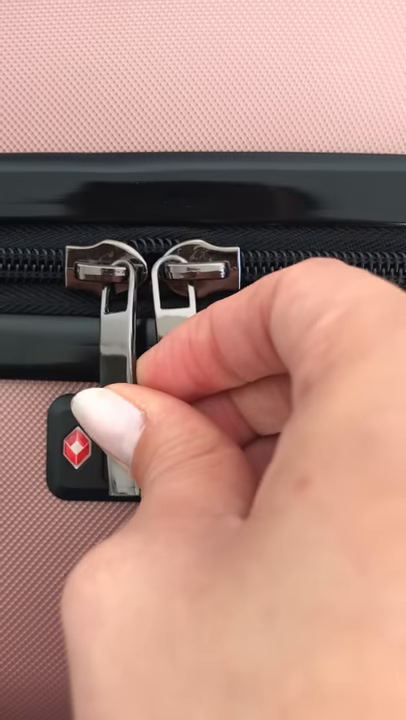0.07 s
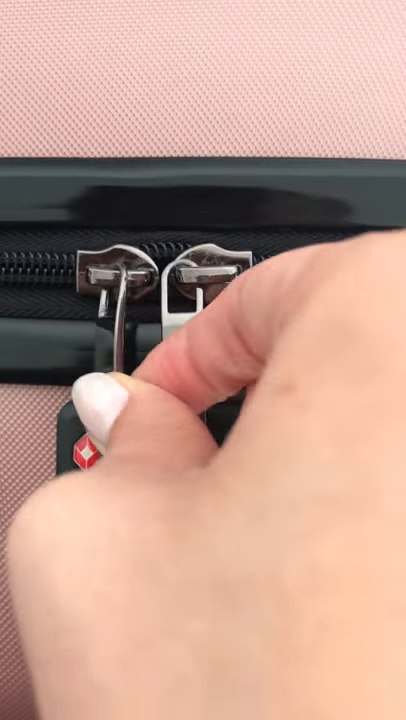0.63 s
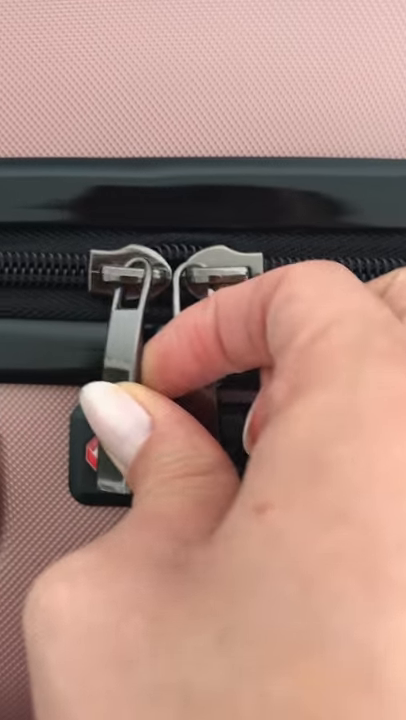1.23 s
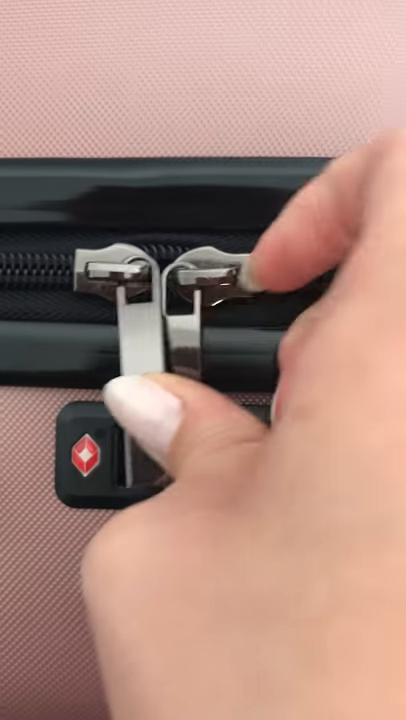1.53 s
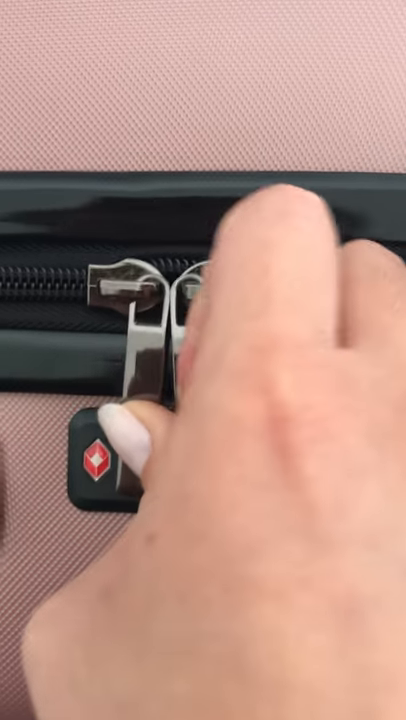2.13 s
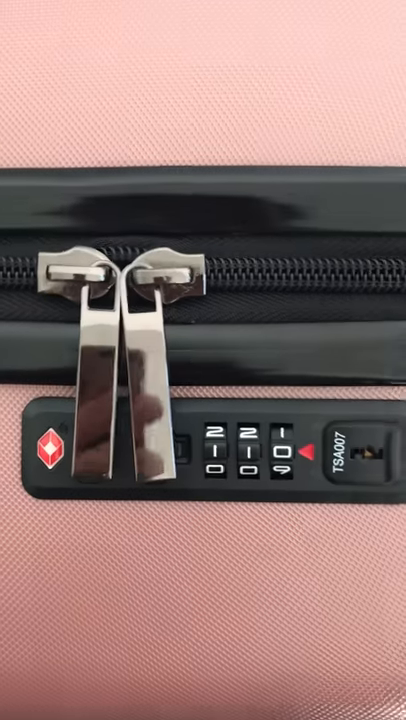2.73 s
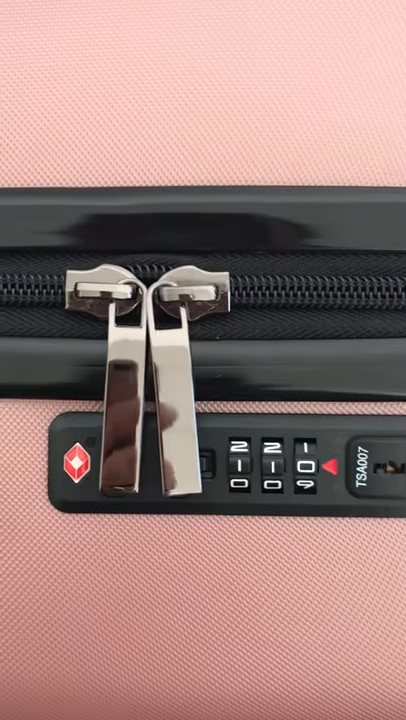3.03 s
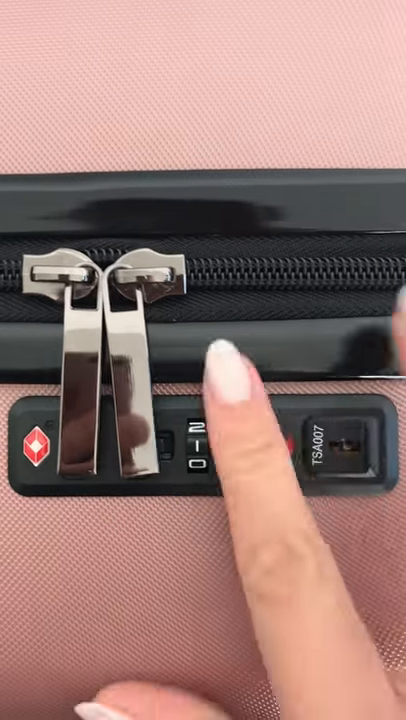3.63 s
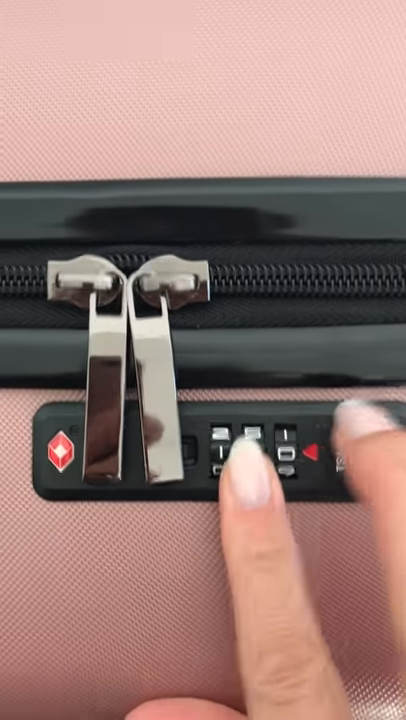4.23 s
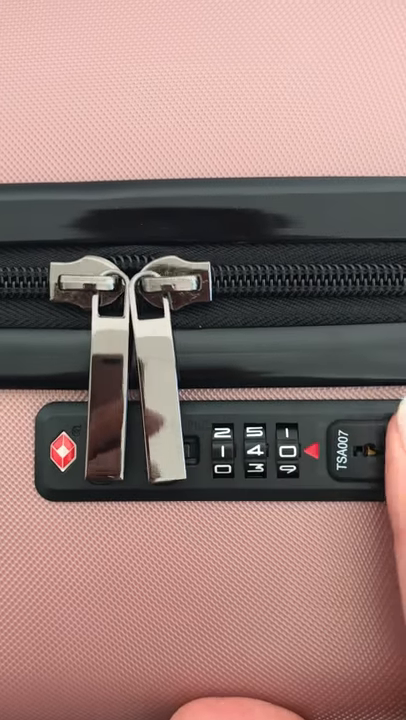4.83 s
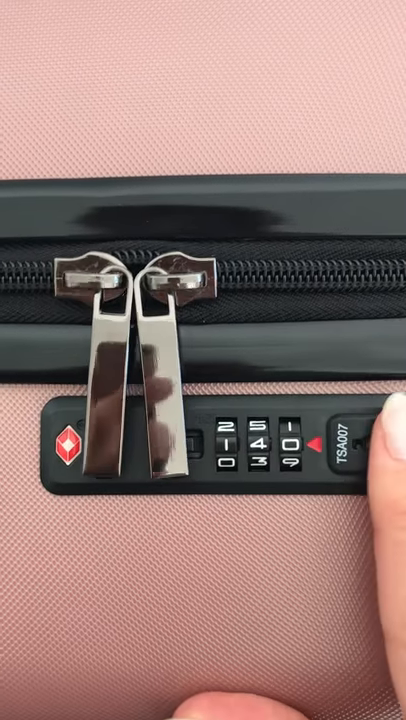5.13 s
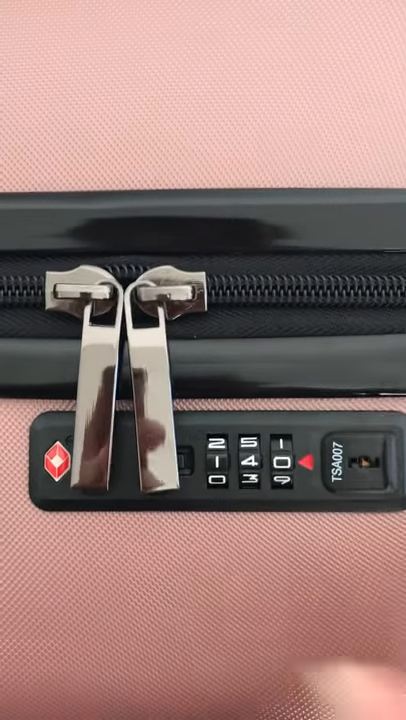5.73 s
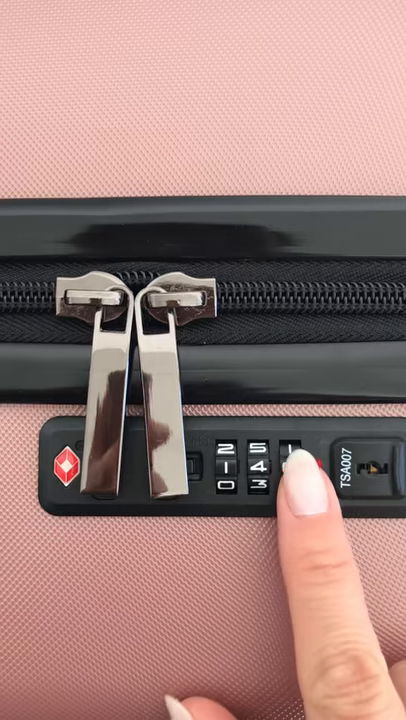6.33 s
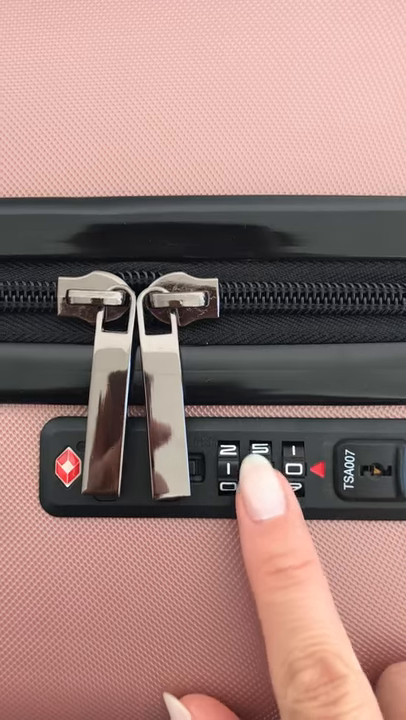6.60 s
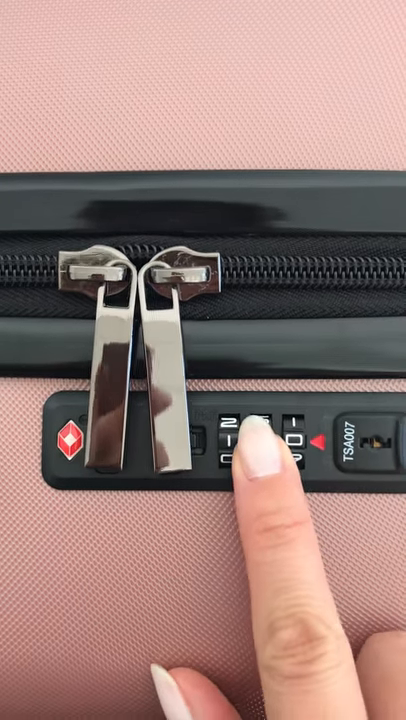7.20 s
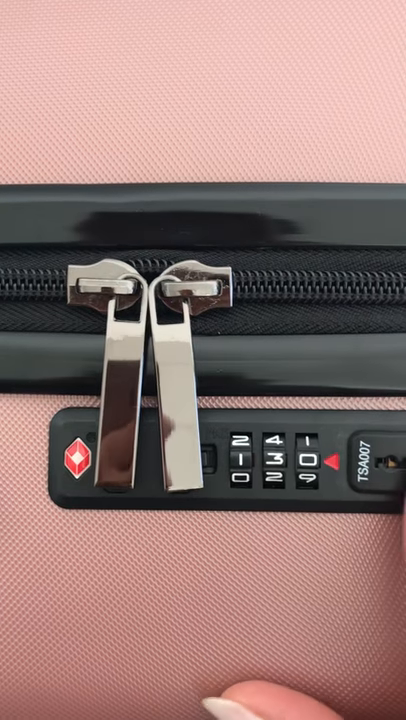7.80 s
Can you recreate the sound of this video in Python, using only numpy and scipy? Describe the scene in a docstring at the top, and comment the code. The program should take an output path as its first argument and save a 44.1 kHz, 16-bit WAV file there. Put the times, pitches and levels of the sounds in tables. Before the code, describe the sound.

Close up in a quiet room, fingers rub on plastic while metal zipper pulls knock lightly around a suitcase's combination lock. Two loud snaps in quick succession seat them in the catch, leaving a short metallic rattle and a soft clink. Then the number wheels turn with light, irregular clicks separated by pauses, and fingertip pushes bring soft hollow thumps from the hard case.

```python
"""Suitcase combination lock

Two metal zipper pullers are worked into the lock of a hard suitcase and snap home; then a fingernail
flicks the number wheels round. Contacts ring the small lock body and the hollow shell behind it;
fingers rub the plastic and flex the lid. The microphone is a hand away, in a quiet room with a low rumble."""
import sys
import numpy as np
from scipy import signal
from scipy.fft import rfft, irfft, next_fast_len
from scipy.io import wavfile

SR = 44100
rng = np.random.default_rng(int(sys.argv[2]) if len(sys.argv) > 2 else 0)


def dump_mix(stems):
    """Bounce the given channels to the path in sys.argv[1] as a 16-bit WAV at rate SR."""
    frames = np.atleast_2d(stems).T  # one column per channel
    limited = np.clip(frames, -1, 1)  # hard clip at full scale
    pcm = np.round(limited * 32767).astype(np.int16)
    wavfile.write(sys.argv[1], SR, pcm)


N = 355401

# Relative noise spectra: f/Hz, density/dB
RUMBLE_SPECTRUM = [(15, -50.5), (30, -22.5), (48, 1), (100, -1), (130, -8.5), (195, -11.5), (427, -23),
                   (700, -28), (1300, -32.5), (2500, -35.5), (5000, -40.5), (10400, -45), (14800, -42),
                   (16000, -47)]
HISS_SPECTRUM = [(60, -7.5), (150, 14), (400, -0.5), (1000, -8.5), (2500, -11), (4500, -14), (7000, -17),
                 (10500, -19), (15000, -22)]
ECHO_SPECTRUM = [(100, 5.5), (500, 6.5), (1500, 1), (4000, -4.5), (8000, -10), (16000, -8)]
SKIN_SPECTRUM = [(80, -5.5), (200, 7.5), (480, 1.5), (750, -8.5), (1200, -13), (3000, -16), (7000, -27.5),
                 (16000, -26.5)]  # fingertip on plastic
DRAG_SPECTRUM = [(90, -15.5), (200, 5.5), (380, 0), (600, -0.5), (900, -11), (1300, -14), (2500, -26.5),
                 (6000, -38.5), (16000, -44)]  # soft friction
SHELL_SPECTRUM = [(100, -6), (400, 0), (1000, -3.5), (1400, -8.5), (1900, -12.5), (2650, -13),
                  (3400, -14.5), (5000, -21.5), (16000, -30.5)]  # dense overlapping modes
RATTLE_SPECTRUM = [(200, -22.5), (900, -5), (1800, -1.5), (2500, 3), (4300, 2), (6000, -4), (10000, -12.5),
                   (13200, -17.5), (13900, -7), (14600, -16), (16000, -22.5)]  # pullers and zip

# Modes: f/Hz, relative level/dB, t60/s
LOCK_MODES = [(230, -17, 0.035), (350.6, -8, 0.026), (562, -0.5, 0.019), (643, -8.5, 0.02),
              (883.6, -4, .008), (1080, -2, 0.008), (1534.5, -2.5, 0.006), (2220, -5, 0.0099),
              (2640, -4, 0.0089), (3599, -12, .004), (4780, -5, 0.006), (8800, -5.5, 0.004),
              (11970, -3, 0.0067), (13350, -2, 0.0079)]  # lock body, damped by its mounting
SHELL_MODES = [(332.8, -21, 0.2), (400, -22, 0.1), (518, -20.5, 0.2), (560, -22, 0.15), (705, -22, 0.14),
               (845, -24, 0.12), (945, -22.5, 0.12), (1033, -23, 0.1), (1242, -25, 0.11),
               (1540, -24.5, 0.07)]  # hollow shell
LID_MODES = [(64.5, -8, 0.12), (107.1, -5, 0.091), (134.4, -0.5, 0.14), (173, -5.5, 0.34), (221, -9, 0.12),
             (345, -8.5, 0.066), (472, -11.5, 0.051)]  # whole lid flexing
PANEL_MODES = [(286, 2, 0.019), (472, 0.5, 0.011)]  # panel under the lock
WHEEL_MODES = [(1956, 3, 0.0042), (4306, 5, 0.0067), (5400, -4, 0.003), (7130, -5.5, 0.00396),
               (12830, 7.5, 0.00395)]  # wheel on its detent spring
CATCH_MODES = [(3300, -9.5, 0.011), (4280, 3, 0.005), (7100, -4.5, .004), (8200, -6.5, .004),
               (12200, -6, .004)]  # steel catch holding the pullers
PULLER_MODES = [(2425, 0.5, 0.25), (3085, -5.5, .23), (3268, -5.5, 0.17), (4320, -8.5, .2),
                (4660, -10.5, .18), (5037, -15, 0.27), (6300, -14, 0.25), (7400, -9, .15),
                (9200, -10.5, .14), (12100, -8, .15), (13820, -10.5, .27)]  # free-hanging puller
TINK_MODES = [(1220, -10, 0.031), (2340, -8.5, 0.032), (3120, -10, 0.027), (4030, 0, .035),
              (4900, -8, .025), (6100, -1, 0.031), (9900, -20, 0.055), (12300, -12, .03), (14500, -6, .03),
              (15450, -6, .025)]  # puller against puller

# Low hum: start/s, end/s, f/Hz, level/dB
HUM = (5.5, 7, 99, -61.5)
# Hiss hanging on after the handling: start/s, end/s, level/dB, fade/s
HISS_SWELLS = [(0, 0.535, -56, .026), (1.415, 1.633, -65.5, 0.044), (1.905, 2.563, -54, 0.21),
               (3.99, 4.593, -56, 0.065), (5.256, 5.345, -55, 0.024)]
# Ringing between knocks: t/s, f/Hz, level/dB, t60/s
FAINT_RINGS = [(2.14, 13920, -60, .3), (3.232, 2140, -57, 0.22)]
# Fingertip shifting on the lock: start/s, end/s, level/dB
FIDGETS = [(0, 0.948, -67.5), (0.998, 1.699, -72), (3.681, 3.993, -63.5), (4.199, 5.252, -67.5),
           (6.303, 7.338, -80.5), (7.448, 7.95, -73)]
# Fine scraping and brushing: t/s, length/s, low f/Hz, high f/Hz, level/dB
SWISHES = [(1.08, .18, 3300, 4300, -73), (2.391, 0.045, 995, 4400, -47), (2.411, .02, 12950, 15000, -45),
           (2.866, 0.25, 2807, 7000, -73), (3.171, 0.35, 1690, 6070, -70),
           (5.812, 0.11, 7000, 15970, -72.5), (6.124, 0.11, 4300, 16000, -69),
           (6.356, 0.067, 1197, 4970, -68.5), (6.53, 0.063, 1000, 6000, -73),
           (7.572, 0.086, 1196, 4000, -70.5), (7.852, 0.06, 1405, 2600, -73.5)]
# Fingertip dragging on plastic: t/s, length/s, level/dB
DRAGS = [(0.299, 0.062, -52), (0.801, 0.063, -59), (.94, 0.054, -53.5), (1.089, 0.046, -59),
         (1.234, 0.031, -55.5), (1.382, 0.031, -53.5), (1.474, 0.064, -45), (1.599, 0.067, -58.5),
         (4.165, .07, -49.5), (4.55, .3, -64.5), (4.86, 0.32, -65.5), (6.951, 0.14, -66.5),
         (7.639, .14, -64.5)]
# Fingertip pushes: t/s, level/dB
PUSHES = [(.128, -51.5), (.724, -50), (0.959, -47.5), (1.239, -53.5), (1.383, -48), (1.483, -42),
          (1.555, -45), (1.657, -52), (1.946, -39), (1.972, -31), (2.135, -41.5), (2.424, -44),
          (3.996, -43.5), (4.044, -51), (4.13, -42), (4.167, -38), (4.502, -43), (5.041, -46), (5.288, -42),
          (5.555, -47.5), (6.332, -46.5), (7.347, -47), (7.378, -44), (7.408, -40.5)]
# Hanging pullers touching: t/s, level/dB
TINK = (3.1245, -42.5)

# Contact registers (body, mid, clink, tick, glint): low f/Hz, high f/Hz
REGISTERS_HZ = [(240, 1300), (1300, 3300), (3300, 6000), (6000, 10000), (10000, 17000)]
# Below: level is the mid register (1.3-3.3 kHz) before gain_db. Body, clink and brightness (above 6 kHz)
# are relative to it; glint (above 10 kHz) is relative to tick (6-10 kHz).
# Metal, nail and skin sliding: t/s, length/s, level/dB, body/dB, brightness/dB
RUBS = [(0, 0.051, -51.5, 9.5, -34), (0.098, 0.024, -53.5, 10.5, -18), (0.233, 0.024, -59.5, 9.5, -9),
        (0.294, 0.03, -51.5, 3, -10), (0.682, 0.066, -61.5, 14, -11), (1.43, 0.049, -69.5, 20, -25),
        (1.649, 0.012, -72, 17.5, -18), (2.121, 0.014, -48.5, 11.5, -12.5), (2.404, 0.031, -37, 0, -14.5),
        (3.219, 0.068, -63.5, 0, -1), (3.858, 0.037, -61.5, 14, -25), (4.125, 0.03, -50, 4, -6),
        (5.274, 0.021, -45, -2, -8.5), (7.347, 0.11, -62, 14, -5.5), (7.59, 0.015, -53, 2, -17)]
# Nail finding a wheel: t/s, level/dB, brightness/dB
NAIL_TAPS = [(3.7765, -63, -13), (3.8464, -60, -9), (3.995, -53, -13), (4.4851, -57, 2), (7.3621, -60, -14),
             (7.3753, -52, -21), (7.381, -53.5, -17)]
# Wheels dropping into detents: t/s, level/dB, brightness/dB, glint/dB, note f/Hz, chatter/s
WHEEL_CLICKS = [(3.807, -55.5, -20, -8, 1793, 0.00075), (4.044, -28.5, -6.5, -2, 2430, 0.00076),
                (4.1542, -32, 4, 3, 1490, 0.00082), (4.1566, -34.5, -0.5, -2, 2700, .001),
                (4.1656, -38, -3, -8, 2400, .0015), (4.1673, -34.5, -5.5, -9, 1980, 0.0017),
                (4.319, -53, -13, -8, 1792, 0.00097), (5.0403, -54.5, -6, -10, 1780, 0.001),
                (5.054, -48.5, -20, -6, 1800, 0.0014), (5.277, -40, -30, -4.5, 1884, 0.0011),
                (5.2877, -33, -17.5, -4, 1730, 0.00094), (5.3886, -57.5, -32, -3, 1796, .001),
                (6.379, -56.5, -13, -11, 2720, 0.0029), (6.5742, -53.5, -25, -2, 1587, 0.0045),
                (6.6663, -63, -11, -6, 2000, 0.0013), (7.4086, -36, -4.5, -11, 3620, 0.0018),
                (7.5822, -59.5, -18, -7, 1713, 0.0011), (7.6174, -62.5, -5.5, -5, 2900, 0.0011)]
# Pullers knocking on the lock: t/s, level/dB, brightness/dB, glint/dB, note f/Hz
PULLER_KNOCKS = [(0.0844, -45.5, -21, -3, 2250), (0.128, -29.5, -11, 4, 2030),
                 (0.2638, -53.5, -16, -3, 1600), (0.331, -53, -14, -3, 1800), (0.3395, -46, -7.5, 1, 2700),
                 (0.468, -57.5, -17, -3, 1500), (0.544, -53, -32, -3, 1400), (0.5581, -52.5, -19, -6, 1340),
                 (0.6694, -50.5, -22, -2, 1530), (0.6973, -51, -12.5, -12, 1350),
                 (0.7245, -51.5, -10, -1, 2280), (0.8335, -55.5, -18, 0, 1510),
                 (0.9784, -49.5, -30, -3, 1280), (1.028, -65, -20, -3, 1400), (1.0934, -59, -12, -3, 1440),
                 (1.11, -61, -18, -3, 2200), (1.2383, -53, -26, -4, 1380), (1.286, -65, -18, -3, 2220),
                 (1.3823, -43, -16.5, -14, 1440), (1.467, -51, -10, -5, 2300),
                 (1.4732, -34, -11.5, -6, 2360), (1.4832, -41.5, -3, -18, 2740),
                 (1.539, -63, -12, -5, 1530), (1.5482, -50, -17, -2, 1570), (1.5543, -29.5, -4, 2.5, 2620),
                 (1.6144, -48.5, -16, -2, 2686), (1.9228, -42, -20, -2, 1680),
                 (2.165, -41.5, -7.5, 0, 2499), (2.2036, -49, -7, -3, 2500), (2.2824, -39, -7.5, -12, 2270),
                 (2.389, -59, 1, -10, 2600), (2.3983, -42.5, -9.5, -14, 1540), (2.412, -51, 8, -14, 2840),
                 (2.4327, -44, -1, 1, 1400), (2.469, -48, -5, 1, 2710), (2.574, -67.5, 9.5, 1, 2000),
                 (2.869, -44.5, -9, -3, 1460), (3.2278, -56, -12, -12, 2150)]
# Catch snapping over a puller, puller bottoming in its slot:
# t/s, level/dB, body/dB, clink/dB, brightness/dB, glint/dB, note f/Hz, chatter/s
SNAPS = [(1.9442, -14.5, -5.5, -16.5, -16, -3, 2670, .0006), (1.9463, -19.5, -5, -15, -15, -3, 2690, .0006),
         (1.9653, -28, 8.5, -1, -4.5, -1.5, 699, .0007), (1.9677, -26, 8, 0, 2, -2.5, 1120, .0009),
         (2.136, -19, -6.5, 2, 0.5, -0.5, 2480, 0.00059), (2.1392, -22.5, -1.5, -1, -1, -1, 2830, 0.001),
         (2.1412, -27, -0.5, -2, -4.5, -2, 1500, .001)]

# Clink against brightness: offset/dB, slope/(dB/dB)
KNOCK_CLINK, WHEEL_CLINK, RUB_CLINK = (0, 0.66), (4.15, 0.75), (2.5, 1.3)
SOFT_GLINT_DB, TAP_NOTE_HZ, TAP_CHATTER_S = -4.5, 1610, 0.0013
RING_S, TOP_HZ = .2, 16400


def undb(db):
    """Decibels to gain."""
    return 10 ** (np.asarray(db) / 20)


def clock(length_s):
    """Sample times in s."""
    return np.arange(int(length_s * SR)) / SR


def decay(t, t60_s):
    """Envelope falling 60 dB in t60_s."""
    return np.exp(-np.log(1000) * t / t60_s)


def level(x, db, head_s=None):
    """Scale x to an rms level over its first head_s (default: all of it)."""
    head = x if head_s is None else x[:int(head_s * SR)]
    return x * undb(db) / np.sqrt(np.mean(head ** 2) + 1e-20)


def add(out, start_s, x):
    """Mix x in at start_s."""
    i = int(np.clip(start_s * SR, 0, N - 1))
    out[i:i + len(x)] += x[:N - i]


def bandpass(x, band_hz, order=2):
    """Butterworth band filter."""
    return signal.sosfilt(signal.butter(order, band_hz, "band", fs=SR, output="sos"), x)


def colour(x, spectrum):
    """Filter x by a curve of (f/Hz, gain/dB) points."""
    hz, db = np.transpose(spectrum)
    size = next_fast_len(len(x) + 2048)
    bins_hz = np.maximum(np.fft.rfftfreq(size, 1 / SR), 1)
    gain = undb(np.interp(np.log(bins_hz), np.log(hz), db))
    return irfft(rfft(x, size) * gain, size)[:len(x)]


def wander(t, step_s, points):
    """Random values joined by straight lines."""
    return np.interp(t, np.arange(points) * step_s, rng.standard_normal(points))


def grit(size, spread_db):
    """Microscopic contacts: noise with a few outstanding peaks."""
    grains = np.random.default_rng(rng.integers(2 ** 31))
    push, height = grains.standard_normal((size, 2)).T
    return push * undb(spread_db * height)


def fading_noise(length_s, t60_s):
    """Dense modes dying away together; unit energy."""
    t = clock(length_s)
    x = rng.standard_normal(len(t)) * decay(t, t60_s)
    return x / np.linalg.norm(x)


def ring(modes, scatter_db, detune):
    """Damped modes; the spot struck varies each one's strength, sign and pitch."""
    hz, db, t60_s = np.transpose(modes)[:, :, None]
    strength, side, shift = rng.standard_normal((3, len(hz), 1))
    t = clock(min(RING_S, t60_s.max()))
    gain = np.sign(side) * undb(db + scatter_db * strength)
    partials = gain * decay(t, t60_s) * np.sin(2 * np.pi * hz * (1 + detune * shift) * t)
    return np.pad(partials.sum(axis=0), (0, int(RING_S * SR) - len(t)))


def lock_sound(force, part_modes, db, shares_db, head_s, crack_db, shell_db):
    """A force rings part, lock and shell; contact place and hardness set each register's share."""
    lock = ring(list(LOCK_MODES) + list(part_modes), scatter_db=1.5, detune=.02)
    modes = lock + undb(shell_db) * ring(SHELL_MODES, scatter_db=1, detune=0.008)
    crack = fading_noise(RING_S, t60_s=0.003313)  # heavily damped lock plastic
    shell = colour(fading_noise(RING_S, t60_s=0.06), SHELL_SPECTRUM)
    response = modes / np.linalg.norm(modes) + undb(crack_db) * crack + undb(shell_db - 1) * shell
    sound = signal.fftconvolve(force, response)
    body_db, clink_db, bright_db, glint_db = shares_db
    tick_db = bright_db - 10 * np.log10(1 + undb(glint_db) ** 2)
    registers_db = body_db, 0, clink_db, tick_db, tick_db + glint_db
    return sum(level(bandpass(sound, band_hz, order=3), db + share_db, head_s)
               for band_hz, share_db in zip(REGISTERS_HZ, registers_db))


def clicks(rows, part_modes, gain_db, chatter_db, crack_db, shell_db, note_db, note_t60_s):
    """One hard contact per row (columns as SNAPS), then chatter; the spot struck sets a short note."""
    out, t = np.zeros(N), clock(.012)
    for start_s, db, *shares_db, note_hz, chatter_s in rows:
        chatter = grit(len(t), spread_db=5.5) * np.exp(-t / chatter_s)
        force = undb(chatter_db) * chatter / np.linalg.norm(chatter)
        force[0] += 1
        modes = list(part_modes) + [(note_hz, note_db, note_t60_s)]
        add(out, start_s, lock_sound(force, modes, db + gain_db, shares_db, .006, crack_db, shell_db))
    return out


def shares(body_db, bright_db, clink_law, glint_db=SOFT_GLINT_DB):
    """Body, clink, brightness, glint in dB; harder contacts raise clink along with brightness."""
    offset_db, slope = clink_law
    return body_db, offset_db + slope * bright_db, bright_db, glint_db


def knock(start_s, db, bright_db, glint_db=SOFT_GLINT_DB, note_hz=TAP_NOTE_HZ):
    """Click row for a loose knock: the firmer, the less body."""
    reference_db = -46
    body_db = -2 - .45 * (db - reference_db)
    return start_s, db, *shares(body_db, bright_db, KNOCK_CLINK, glint_db), note_hz, TAP_CHATTER_S


def hum(waver_db):
    """A faint low hum rises, wavers and sinks away."""
    start_s, end_s, hz, db = HUM
    out, t = np.zeros(N), clock(end_s - start_s)
    tone = np.sin(2 * np.pi * hz * t) * undb(waver_db * wander(t, step_s=.1, points=40))
    add(out, start_s, level(tone * signal.windows.tukey(len(t), .5), db))
    return out


def background(rise_s):
    """Room rumble, hum, and hiss swelling around the handling."""
    t = np.arange(N) / SR
    rumble = level(colour(rng.standard_normal(N), RUMBLE_SPECTRUM), db=-56)
    swell = np.zeros(N)
    for start_s, end_s, db, fade_s in HISS_SWELLS:
        ramp = np.minimum((t - start_s) / rise_s, (end_s - t) / fade_s)
        swell += undb(db) * np.clip(ramp + .5, 0, 1)
    return rumble + hum(waver_db=2.5) + swell * level(colour(rng.standard_normal(N), HISS_SPECTRUM), db=0)


def room_echo(x, wet_db, t60_s, onset_s):
    """Diffuse echo of a small furnished room."""
    t = clock(.6)
    build_up = 1 - np.exp(-(t / onset_s) ** 2)
    tail = colour(rng.standard_normal(len(t)), ECHO_SPECTRUM) * decay(t, t60_s) * build_up
    return signal.fftconvolve(x, tail / np.linalg.norm(tail))[:N] * undb(wet_db)


def faint_rings(width_hz):
    """Narrow, slightly rough rings fading out."""
    out = np.zeros(N)
    for start_s, hz, db, t60_s in FAINT_RINGS:
        ringing = bandpass(fading_noise(2 * RING_S, t60_s), [hz - width_hz / 2, hz + width_hz / 2])
        add(out, start_s, level(ringing, db, head_s=.03))
    return out


def fidgets(spread_db):
    """Skin and nail creep over plastic in sparse, faint slips."""
    out = np.zeros(N)
    for start_s, end_s, db in FIDGETS:
        slips = np.zeros(int((end_s - start_s) * SR))
        place, size, side = rng.random((300, 3)).T
        strength = undb(-spread_db * np.log(size + .01))
        slips[(place * len(slips)).astype(int)] = np.sign(side - .5) * strength
        add(out, start_s, level(colour(slips, SKIN_SPECTRUM), db))
    return out


def swishes():
    """Fine scraping and brushing: bands of hiss that swell and fade."""
    out = np.zeros(N)
    for start_s, length_s, low_hz, high_hz, db in SWISHES:
        hiss = bandpass(grit(int(length_s * SR), spread_db=0.5), [low_hz, high_hz])
        add(out, start_s, level(hiss * signal.windows.hann(len(hiss)), db))
    return out


def drags(grip_db):
    """Skin drags over plastic: a dull rub that catches and lets go."""
    out = np.zeros(N)
    for start_s, length_s, db in DRAGS:
        t = clock(length_s)
        grip = undb(grip_db * wander(t, step_s=.008, points=60))
        force = grit(len(t), spread_db=2.5) * grip * signal.windows.tukey(len(t), .7)
        add(out, start_s, level(colour(force, DRAG_SPECTRUM), db))
    return out


def rubs(gain_db, grip_db, slip_db, slips_per_s):
    """Stick-slip on the panel: tiny uneven contacts, with a jerk at each release."""
    out = np.zeros(N)
    for start_s, length_s, db, body_db, bright_db in RUBS:
        t = clock(length_s)
        grip = undb(grip_db * wander(t, step_s=.002, points=100))
        slips = (np.cumsum(rng.random(40) + .5) * SR / slips_per_s).astype(int)
        force = grit(len(t), spread_db=3.5)
        force[slips[slips < len(t)]] += undb(slip_db)
        force *= grip * signal.windows.tukey(len(t), .3)
        shares_db = shares(body_db, bright_db, RUB_CLINK)
        rub = lock_sound(force, PANEL_MODES, db + gain_db, shares_db, t[-1], crack_db=-2, shell_db=-3)
        add(out, start_s, rub)
    return out


def lid_thumps(push_s, damp_s):
    """A push booms the lid; the resting finger damps it."""
    out, t = np.zeros(N), clock(RING_S)
    envelope = (1 - np.exp(-t / push_s)) * np.exp(-t / damp_s)
    for start_s, db in PUSHES:
        boom = ring(LID_MODES, scatter_db=2, detune=0.02)
        add(out, start_s, level(boom * envelope, db, head_s=.03))
    return out


def hand(pat_db):
    """Fingers slide and push, patting the panel and booming the lid; the nail taps the wheels."""
    pat_shares_db = shares(body_db=15, bright_db=-15, clink_law=RUB_CLINK)
    pats = [(start_s, db + pat_db, *pat_shares_db, TAP_NOTE_HZ, TAP_CHATTER_S) for start_s, db in PUSHES]
    taps = [knock(*row) for row in NAIL_TAPS]
    touches = clicks(pats + taps, PANEL_MODES, gain_db=-0.5, chatter_db=-1,
                     crack_db=-4.5, shell_db=-1.5, note_db=-0.5, note_t60_s=0.0097)
    sliding = rubs(gain_db=-4, grip_db=2, slip_db=23.5, slips_per_s=130)
    brushing = swishes() + fidgets(spread_db=4.5) + drags(grip_db=4.5)
    return touches + sliding + brushing + lid_thumps(push_s=0.0035, damp_s=0.14)


def wheels(body_db):
    """Each step of a number wheel clicks on its detent spring."""
    steps = [(start_s, db, *shares(body_db, bright_db, WHEEL_CLINK, glint_db), note_hz, chatter_s)
             for start_s, db, bright_db, glint_db, note_hz, chatter_s in WHEEL_CLICKS]
    return clicks(steps, WHEEL_MODES, gain_db=3, chatter_db=-6,
                  crack_db=-8, shell_db=-2, note_db=4, note_t60_s=0.00545)


def tink():
    """The hanging pullers touch, clear of the case: a thin clink without body."""
    start_s, db = TINK
    out = np.zeros(N)
    tones = ring(TINK_MODES, scatter_db=1, detune=.005)
    burst = fading_noise(RING_S, t60_s=0.047)
    crack = colour(burst, [(500, -22), (2400, -1), (6500, 3), (9500, -9), (14500, -2)])
    add(out, start_s, level(tones / np.linalg.norm(tones) + crack, db, head_s=.01))
    return out


def snap_rattle(start_s, tones_db, rattle_db):
    """After the second snap, pullers and zip rattle on with a trace of their own pitch."""
    out = np.zeros(N)
    tones = ring(PULLER_MODES, scatter_db=2, detune=0.0037)
    rattle = colour(fading_noise(2 * RING_S, t60_s=0.23), RATTLE_SPECTRUM)
    add(out, start_s, level(tones, tones_db, head_s=.05))
    add(out, start_s, level(rattle, rattle_db, head_s=.05))
    return out


def pullers():
    """The pullers knock about the lock, snap home in turn, then touch once."""
    knocks = clicks([knock(*row) for row in PULLER_KNOCKS], CATCH_MODES, gain_db=1, chatter_db=-3,
                    crack_db=-7, shell_db=-5, note_db=6, note_t60_s=.0062)
    snaps = clicks(SNAPS, CATCH_MODES, gain_db=0.5, chatter_db=-3.5,
                   crack_db=-6, shell_db=-2, note_db=5, note_t60_s=0.007)
    return knocks + snaps + snap_rattle(start_s=2.137, tones_db=-48, rattle_db=-39.5) + tink()


def scene():
    """Handling, dialling, echo and background; mono."""
    handling = pullers() + hand(pat_db=-20.5) + faint_rings(width_hz=190)
    dialling = wheels(body_db=-6)
    radiated = handling + undb(-2.5) * dialling  # recessed wheels stir the room less
    echo = room_echo(radiated, wet_db=-21, t60_s=0.27, onset_s=0.003)
    return (handling + dialling + echo + background(rise_s=0.024))[None]


def record(dry):
    """Microphone: deep bass cut, clipping at full scale, top cut."""
    bass_cut = signal.butter(2, 32, "high", fs=SR, output="sos")
    top_cut = signal.ellip(8, .2, 70, TOP_HZ, fs=SR, output="sos")
    clipped = np.clip(signal.sosfilt(bass_cut, dry), -1, 1)
    return signal.sosfilt(top_cut, clipped)


dry = scene()
out = record(dry)
dump_mix(out)
```